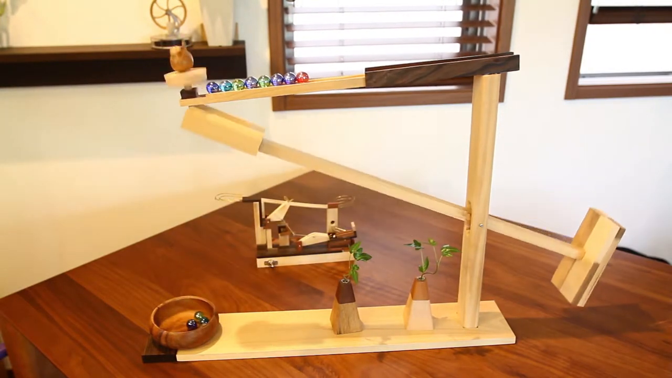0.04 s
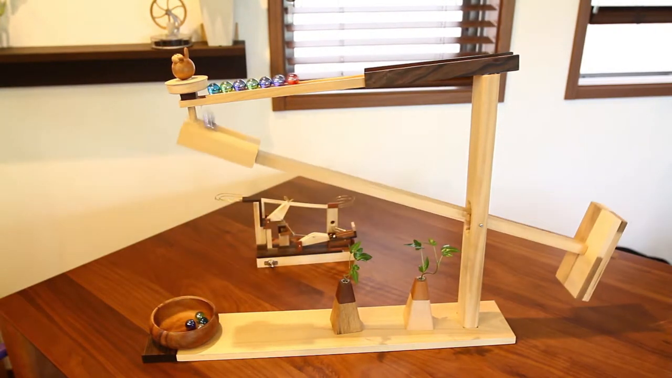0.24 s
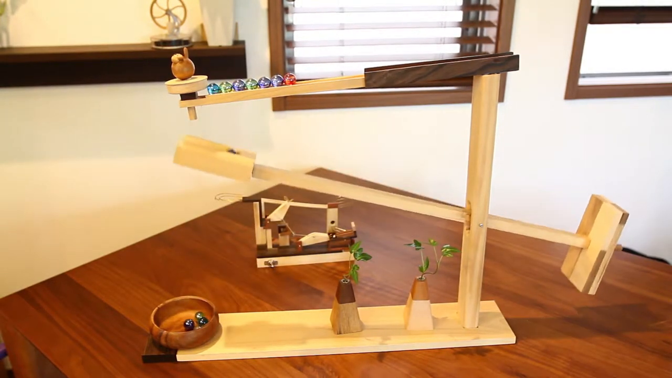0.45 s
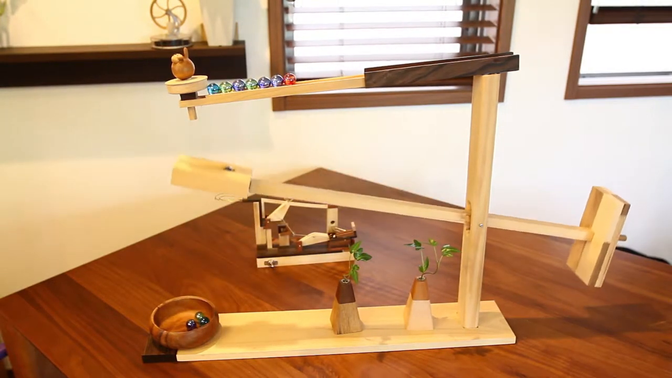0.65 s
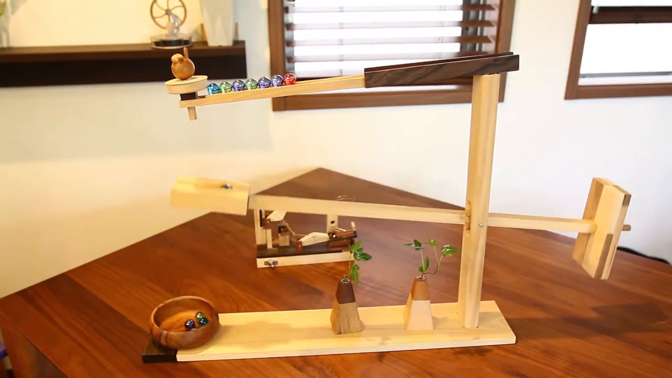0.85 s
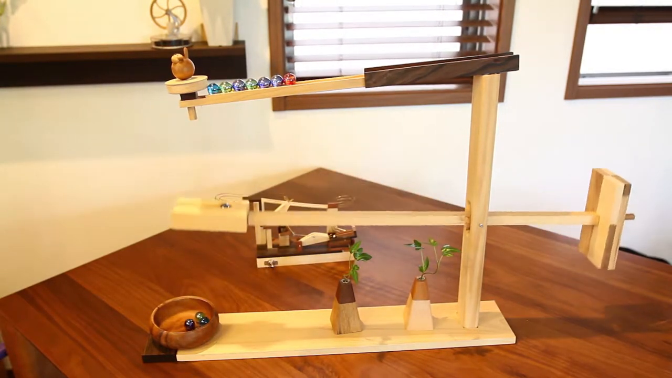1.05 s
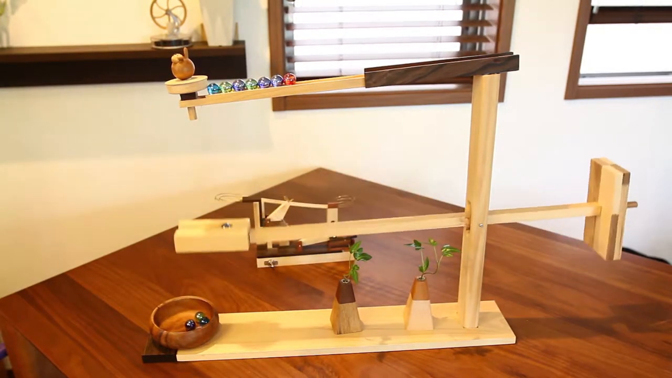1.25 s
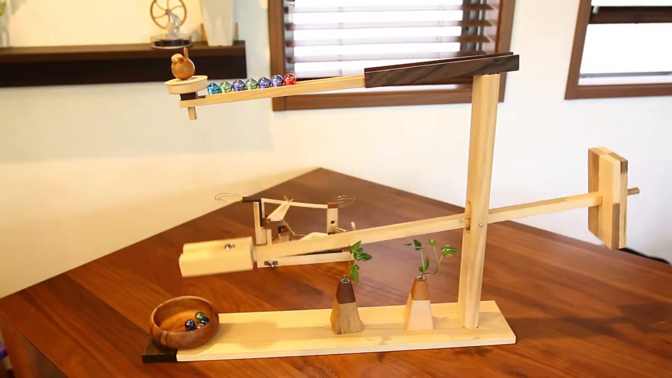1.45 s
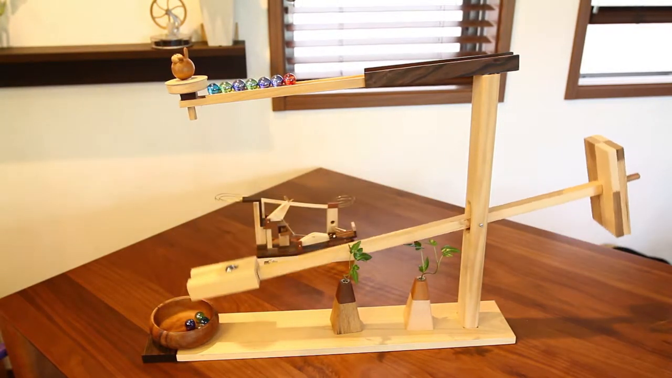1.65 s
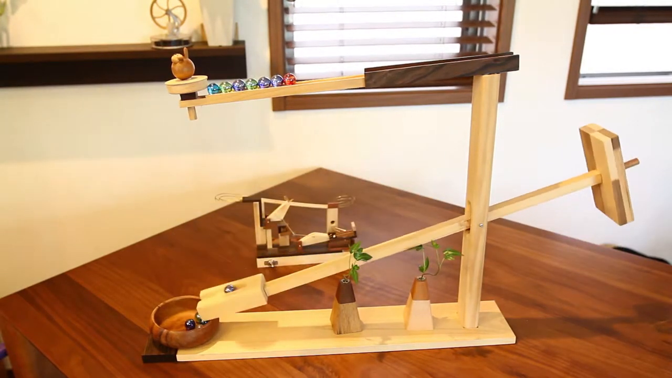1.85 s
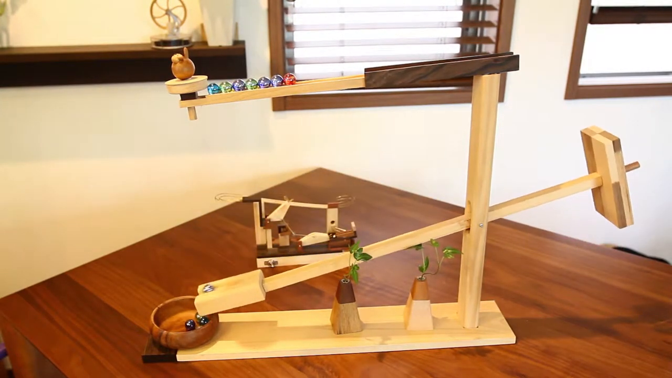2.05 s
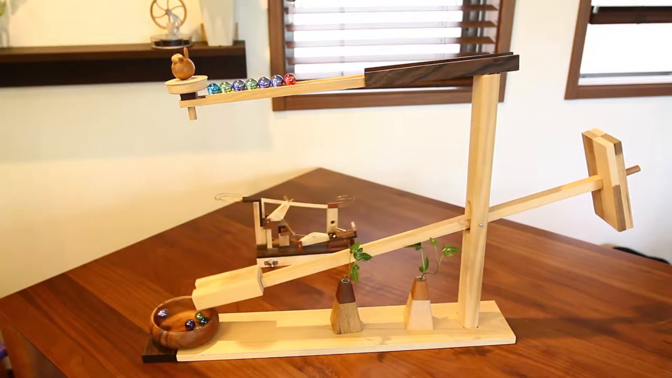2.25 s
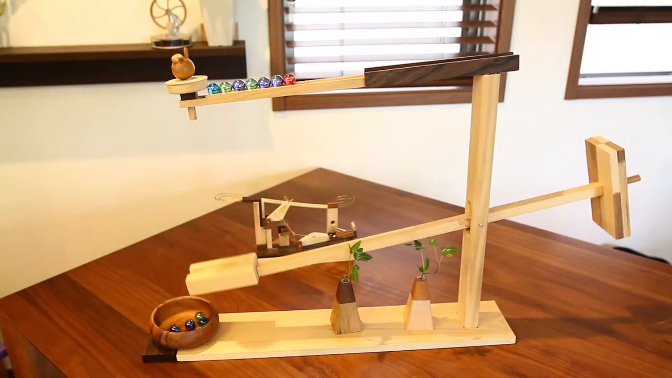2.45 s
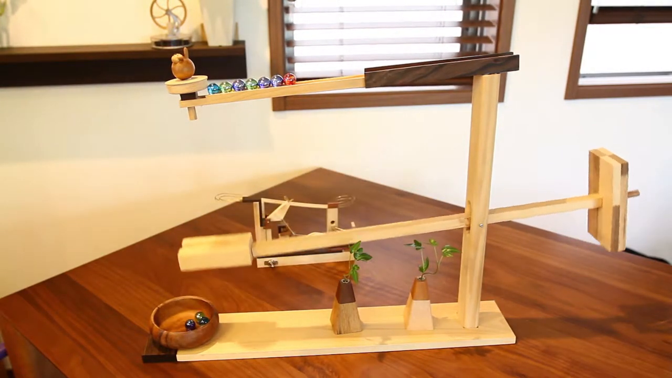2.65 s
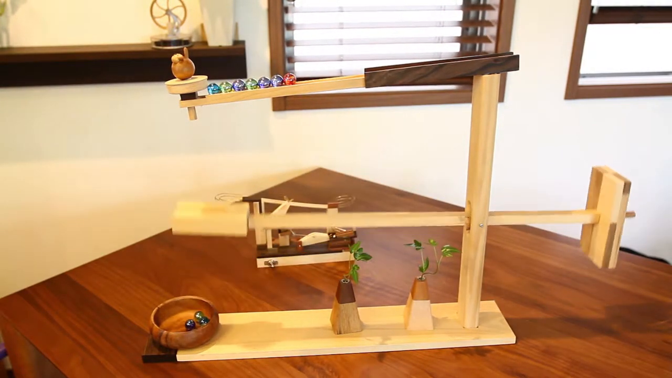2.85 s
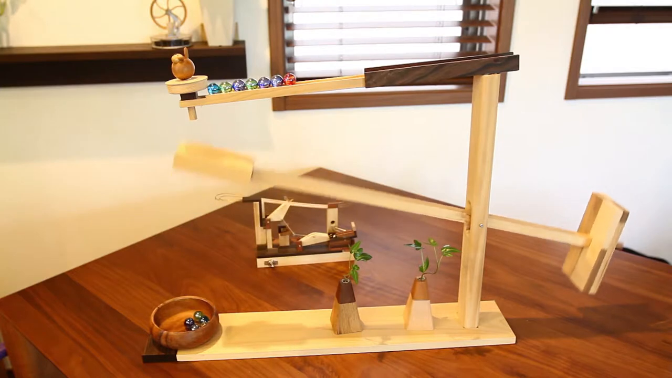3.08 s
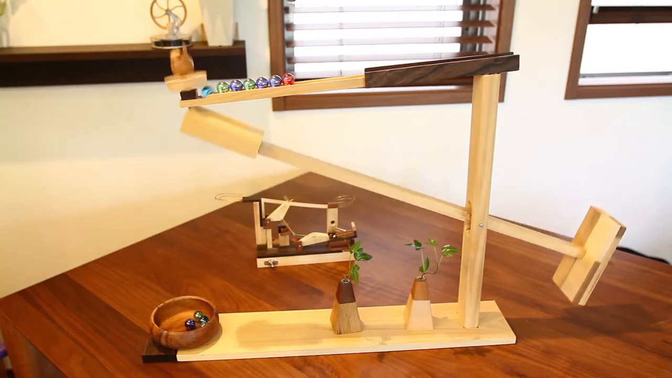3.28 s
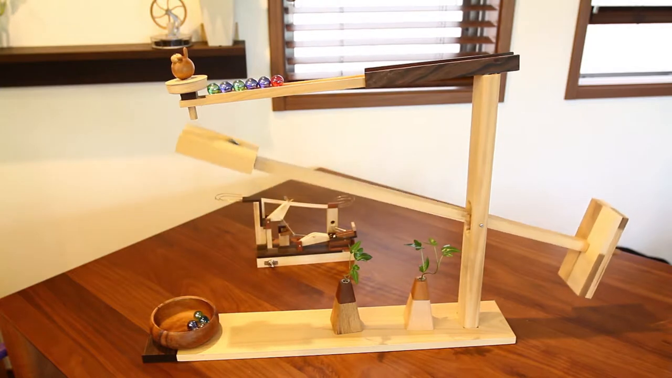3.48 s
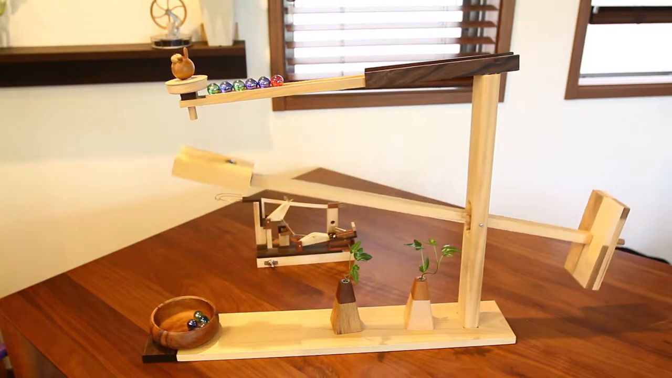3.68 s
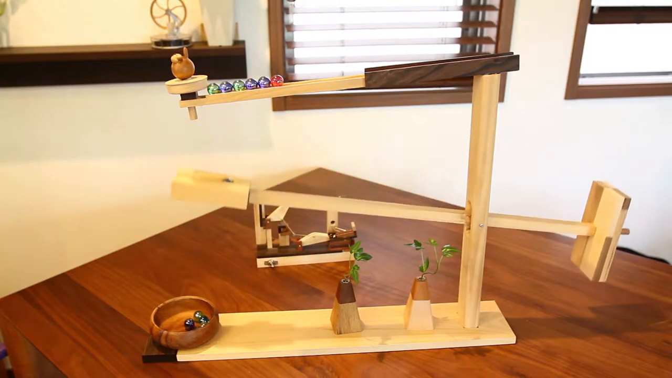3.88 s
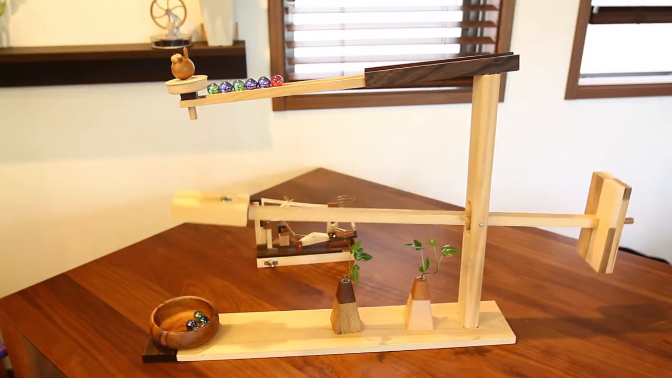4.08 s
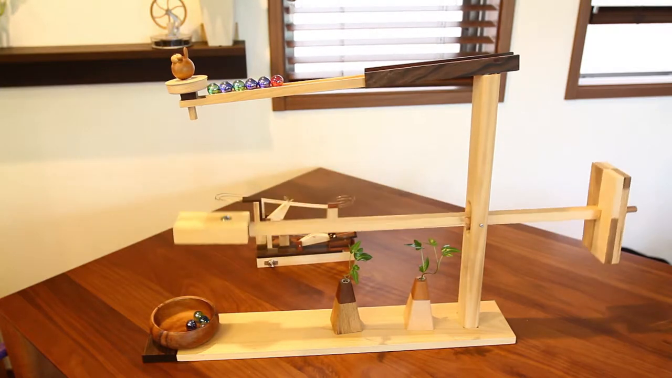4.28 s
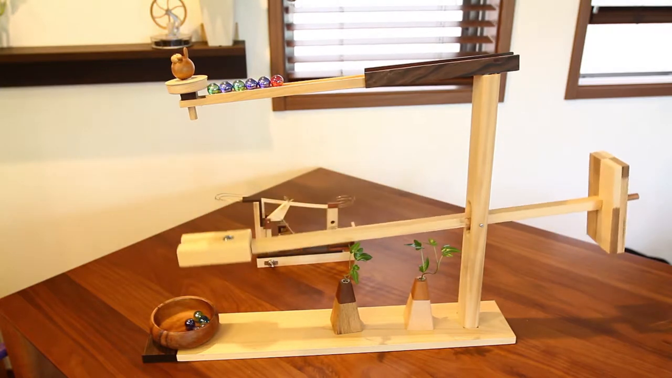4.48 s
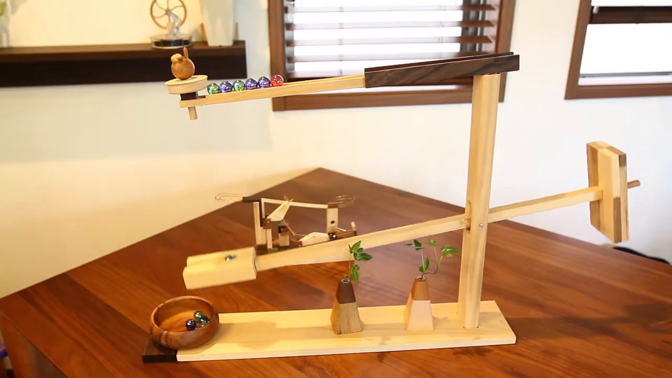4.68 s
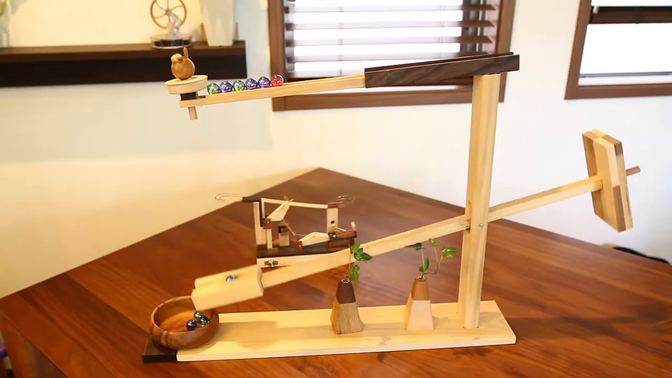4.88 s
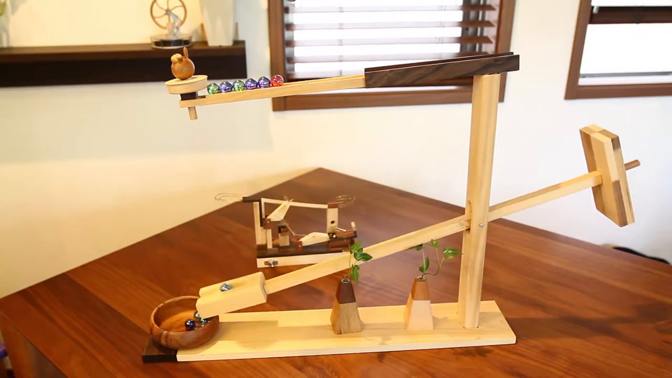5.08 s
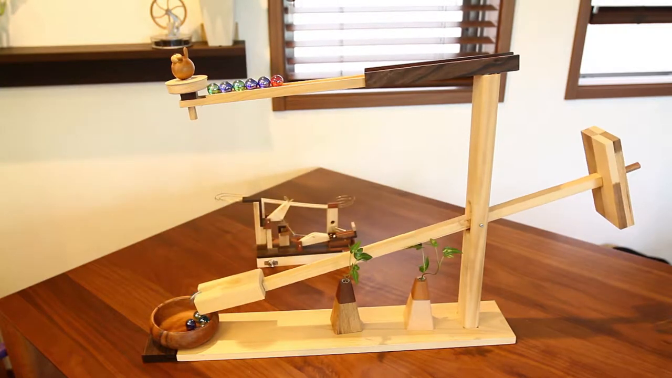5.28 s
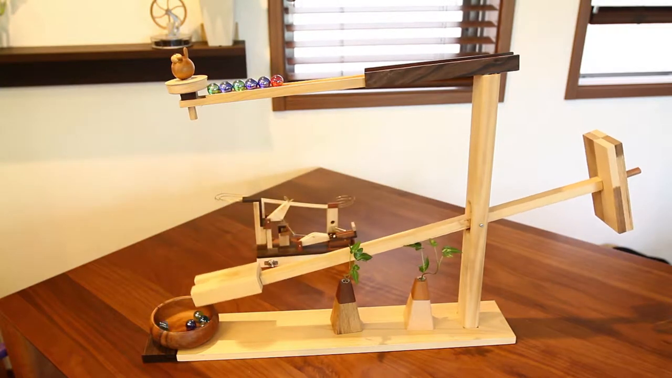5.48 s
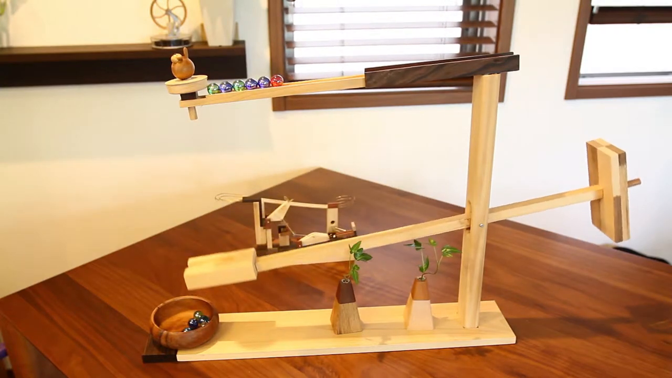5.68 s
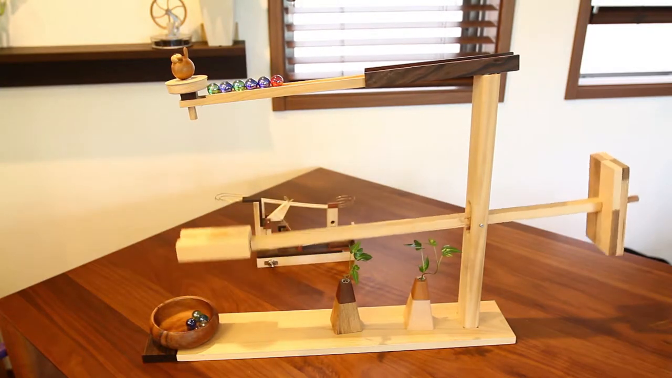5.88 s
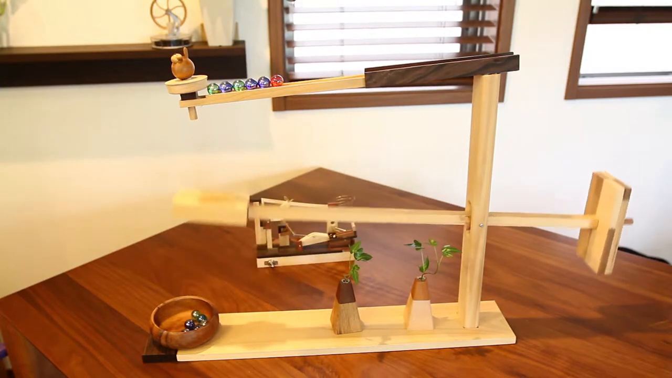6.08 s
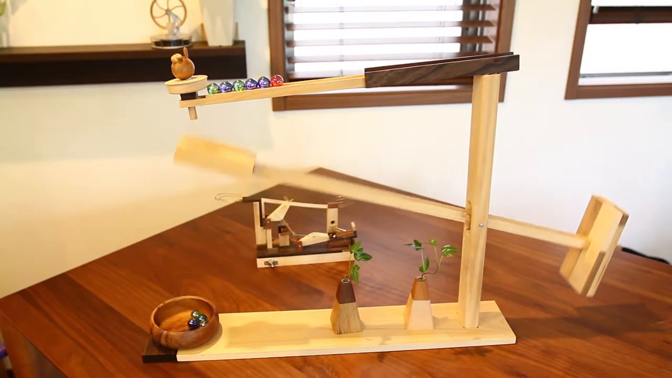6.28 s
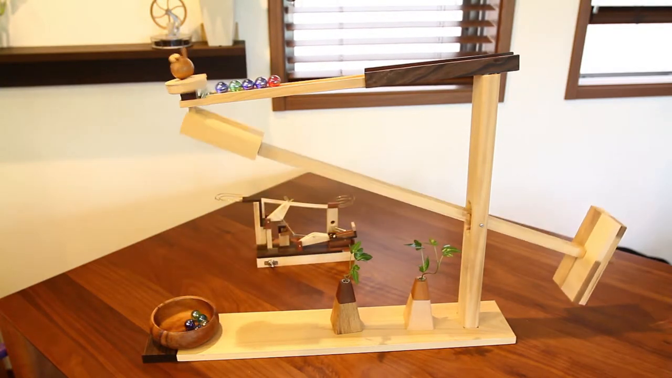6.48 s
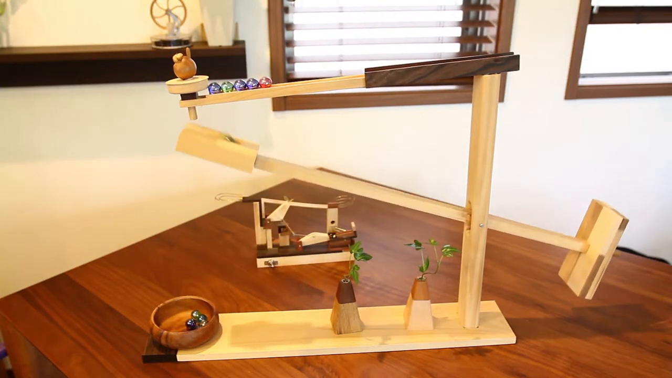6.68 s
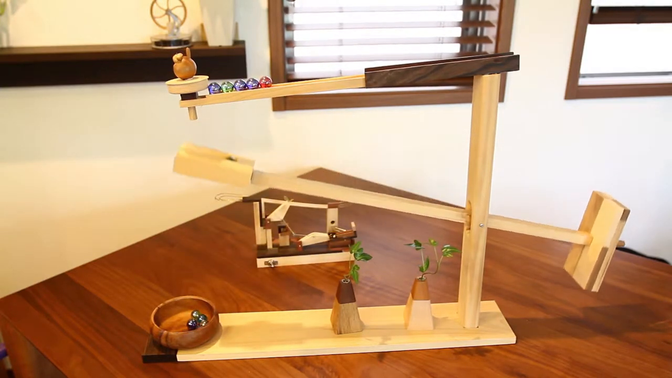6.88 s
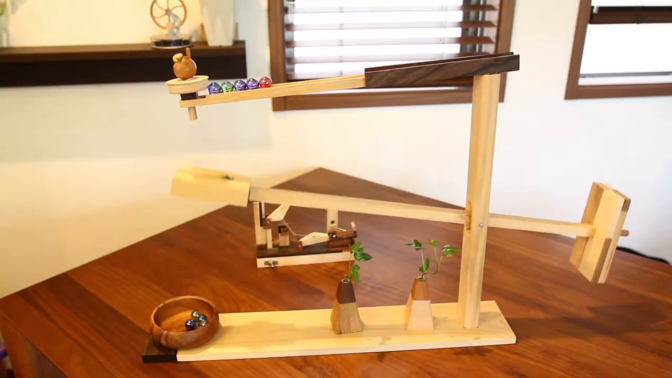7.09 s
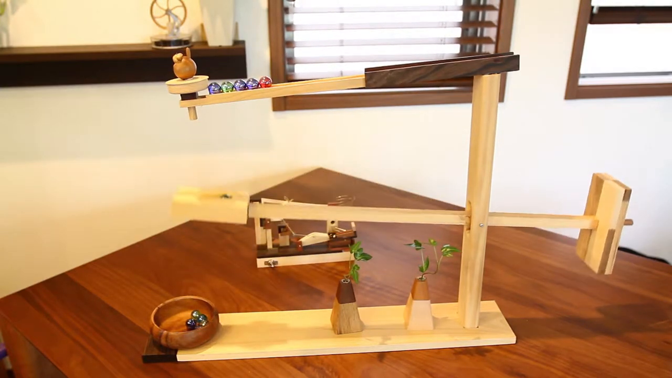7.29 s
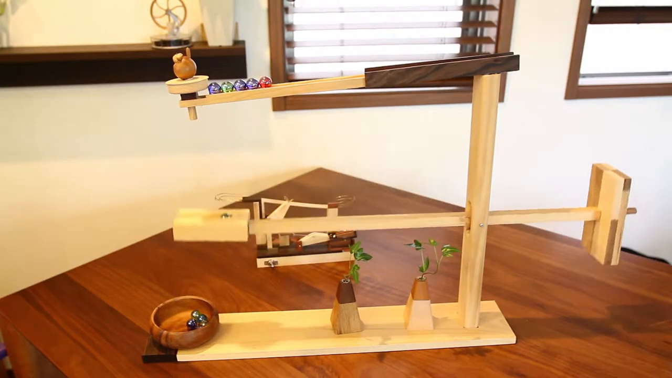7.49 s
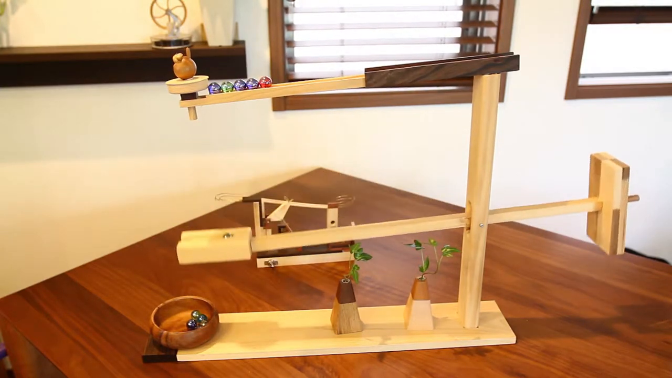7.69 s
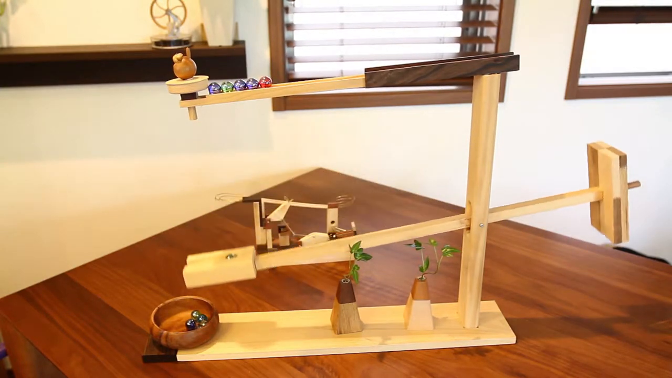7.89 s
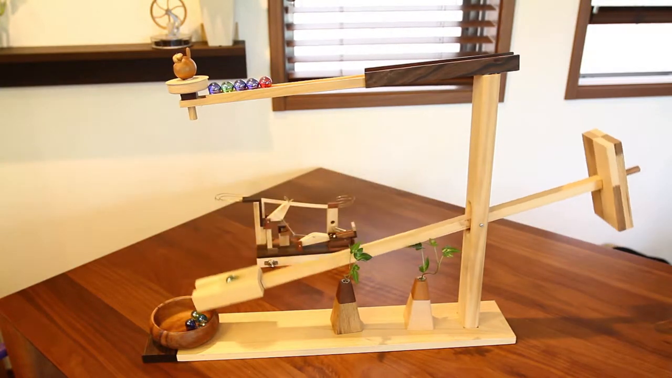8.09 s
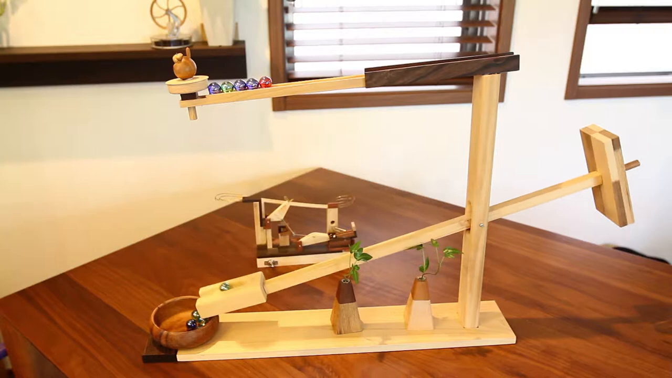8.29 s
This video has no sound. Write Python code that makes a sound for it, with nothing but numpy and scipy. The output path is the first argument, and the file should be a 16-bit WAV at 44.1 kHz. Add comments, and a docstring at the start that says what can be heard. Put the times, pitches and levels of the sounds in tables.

```python
"""A knock of wood on wood comes first, over faint room tone: a marble machine's arm opens a gate.
One glass marble rolls off the track and clacks into the arm's cup; the waiting marbles click together.
The arm sinks onto its stop, the marble cracks into a wooden bowl and clinks among the others, and the
emptied arm clacks as it lifts. Of three swings the last ends as the arm lands, after a few axle squeaks.
Knocks are short cracks and noisy rings, rolling is bumpy noise; both are shaped by each part's resonances."""
import sys
import numpy as np
from scipy import signal
from scipy.fft import rfft, irfft
from scipy.io import wavfile

SR = 44100
rng = np.random.default_rng(int(sys.argv[2]) if len(sys.argv) > 2 else 0)


def transcribe(signal):
    """Save signal, clipped to [-1, 1], as a 16-bit WAV file at the path in sys.argv[1]."""
    frames = np.atleast_2d(signal).T
    limited = np.clip(frames, -1, 1)
    pcm = np.round(limited * 32767).astype(np.int16)
    wavfile.write(sys.argv[1], SR, pcm)


N = 367794  # length in samples

# In the tables below, level_db comes before the gain_db of the function that plays it,
# and hardness_db_per_octave is a treble tilt above 500 Hz.
# A colour is a broad spectrum whose overall level is evened out; modes are resonances standing above it.


def amp(db):
    """Turns decibels into a gain."""
    return 10 ** (np.asarray(db) / 20)


def unit(x):
    """Scales a sound to an energy of one."""
    return x / np.sqrt(np.sum(x ** 2) + 1e-20)


def read(points, hz):
    """Joins (pitch_hz, value) points with straight lines on a log-frequency axis."""
    point_hz, value = np.transpose(points)
    return np.interp(np.log(hz + 1), np.log(point_hz + 1), value)


def add(mix, start_s, sound):
    """Mixes a sound in at its start time, cutting off what runs past the end."""
    part = mix[max(round(start_s * SR), 0):][:len(sound)]
    part += sound[:len(part)]


def body(colour, modes=(), tilt_db=0, size=8192):
    """A part's response to a tap: a broad colour with resonances standing out of it."""
    hz = np.fft.rfftfreq(size, 1 / SR)
    peaks = 1 + sum(amp(2 * db) / (1 + (2 * (hz - f) / width) ** 2) for f, width, db in modes)
    octaves = np.log2(np.maximum(hz, 500) / 500)
    spectrum = amp(read(colour, hz) + tilt_db * octaves) * np.sqrt(peaks)
    # folding the cepstrum gives minimum phase: the response starts at once
    cepstrum = irfft(np.log(spectrum))
    cepstrum[1:size // 2] *= 2
    return unit(irfft(np.exp(rfft(cepstrum[:size // 2], size))))


def noise(colour, modes=(), grain_db=0):
    """Coloured noise of rms one; grain_db, of either sign, makes its bumps uneven."""
    unevenness = np.clip(rng.standard_normal(N), -2, 2)
    bumps = rng.standard_normal(N) * amp(abs(grain_db) * unevenness)
    return unit(signal.oaconvolve(bumps, body(colour, modes))[:N]) * np.sqrt(N)


def crack_of(spread_s, size=4096, count=36):
    """A click smeared by the wood: each band arrives with its own small delay."""
    hz = np.fft.rfftfreq(size, 1 / SR)
    delay_s = np.interp(hz, np.linspace(0, SR / 2, count), spread_s * rng.exponential(1, count))
    phase = -2 * np.pi * np.cumsum(delay_s) * hz[1]
    return unit(irfft(np.exp(1j * phase))[:size // 2])


def strike(blows, colour, modes, gain_db, spread_s, ring_t60, ring_db):
    """Each blow is a short crack and a denser ring of the joined wood, heard through its resonances."""
    out, t = np.zeros(N), np.arange(SR // 3) / SR
    for start_s, level_db, tilt_db in blows:
        # the ring falls by 60 dB in ring_t60 seconds; ring_db is its energy against the crack
        ring = rng.standard_normal(len(t)) * np.exp(-np.log(1000) * t / ring_t60)
        force = amp(ring_db) * unit(ring)
        add(force, 0, crack_of(spread_s))
        # a harder contact is shorter and so reaches higher resonances
        blow = signal.fftconvolve(force, body(colour, modes, tilt_db, size=16384))
        add(out, start_s, amp(level_db + gain_db) * unit(blow))
    return out


def roll(runs, colour, modes, gain_db, grain_db, rise_s, release_s, fade_db_per_s):
    """Rolling or sliding contact bumps over the wood's grain: it sets in, grows quieter and stops."""
    level = np.zeros(N)
    for start_s, level_db, length_s in runs:
        t = np.arange(0, length_s, 1 / SR)
        contact = np.minimum(t / rise_s, 1) * np.minimum((length_s - t) / release_s, 1)
        add(level, start_s, contact * amp(level_db + gain_db - fade_db_per_s * t))
    return level * noise(colour, modes, grain_db)


def repeat(events, pattern):
    """Plays the same pattern of blows at every event."""
    return [(start_s + delay_s, level_db + step_db, tilt_db + harder_db)
            for start_s, level_db, tilt_db, *_ in events
            for delay_s, step_db, harder_db in pattern]


def bounces(events, count):
    """Each event is a run of evenly spaced blows whose level changes by equal steps."""
    return [(start_s + k * gap_s, level_db + k * step_db, tilt_db)
            for start_s, level_db, tilt_db, gap_s, step_db in events
            for k in range(count)]


# Colour of the steady room tone: pitch_hz, level_db
AIR_COLOUR = [(20, -39), (50, -15), (85, -10), (150, -8.5), (250, -4), (450, -8), (800, -8.5),
              (1300, -11.5), (2000, -18.5), (4000, -22), (8000, -27.5), (13000, -31), (16000, -39)]
AIR_DB = -50.5  # rms level against full scale


def room_tone():
    """The quiet room is steady coloured noise."""
    return amp(AIR_DB) * noise(AIR_COLOUR)


# The rising arm slides along the gate's peg and knocks it open:
# start_s, level_db, hardness_db_per_octave, slide_before_s, cup_lip_ping_db
KNOCKS = [(0.0287, -2, -0.5, 0.0013, -7.5), (3.2077, -1, -0.5, 0.02, -20), (6.3888, -3, 0, .029, -11)]
# Every knock throws the gate to and fro alike: delay_s, level_change_db, hardness_change_db_per_octave
GATE_SWING = [(0, 2, 0.4), (0.0163, 0.5, 3), (0.0236, -2.5, -3.5), (0.0599, -7, 1.5)]
# The freed marble jolts the gate on its way out: start_s, level_db, hardness_db_per_octave
GATE_JOLTS = [(0.1276, 2, 1), (3.3036, 0, -0.5), (3.331, 0.5, 6), (6.4511, -2.5, 3), (6.4608, -6, 4),
              (6.4948, -6, 2), (6.5227, -5.5, 3.5)]
# Broad colour of the gate: pitch_hz, level_db
GATE_COLOUR = [(40, -30), (110, 1), (190, 8.5), (420, -4.5), (1000, 1.5), (2600, 11.5), (4200, -4),
               (5200, -3.5), (9000, -10), (13500, -17.5), (16000, -35)]
# Resonances of the gate: pitch_hz, width_hz, level_db
GATE_MODES = [(132, 8.6, 6.5), (189, 16, 12), (263, 20, 0), (367, 19, 18), (560, 45, 16.5), (892, 49, 21),
              (1206, 28, 15.5), (1334, 39, 16), (1673, 120, 8.5), (2370, 60, 8), (4190, 95, 14.5)]
# Broad colour of the track: pitch_hz, level_db
TRACK_COLOUR = [(60, -16.5), (200, 2.5), (450, -4), (900, -4), (1600, 1), (2600, -2.5), (3800, -2),
                (5200, -17), (9000, -28.5), (16000, -40)]
# Resonances of the track: pitch_hz, width_hz, level_db
TRACK_MODES = [(924, 64, 8.7), (1686, 100, 8.3), (2350, 40, 12.4), (2660, 24, 4.3)]
PEG_DB, PEG_TILT_DB = -17.5, 5  # first touch on the peg: level against the knock, hardness per octave
TRACK_DELAY_S, TRACK_S = 0.043, 0.17  # the marble rolls this long after the knock, for this long


def gate():
    """The cup scrapes along the peg and knocks the gate open; one marble rolls down the track."""
    touches = [(s - slide_s, db + PEG_DB, PEG_TILT_DB) for s, db, _, slide_s, _ in KNOCKS]
    slides = [(s - slide_s, db, slide_s) for s, db, _, slide_s, _ in KNOCKS]
    runs = [(s + TRACK_DELAY_S, 0, TRACK_S) for s, *_ in KNOCKS]
    blows = repeat(KNOCKS, GATE_SWING) + GATE_JOLTS + touches
    knocks = strike(blows, GATE_COLOUR, GATE_MODES,
                    gain_db=10.5, spread_s=0.000993, ring_t60=0.036, ring_db=7)
    scrape = roll(slides, GATE_COLOUR, GATE_MODES,
                  gain_db=-32.5, grain_db=-6, rise_s=0.0033, release_s=0.0053, fade_db_per_s=2)
    track = roll(runs, TRACK_COLOUR, TRACK_MODES,
                 gain_db=-21.5, grain_db=0.5, rise_s=0.018, release_s=0.064, fade_db_per_s=27)
    return knocks + scrape + track


# The marble bounces in the hollow cup: start_s, level_db, hardness_db_per_octave, lip_ping_db
CUP_BLOWS = [(0.273, -7, -2, -11), (0.3538, -15.5, -10, -30), (0.3632, -6, -0.5, -20),
             (0.3782, -7.5, -0.7, -13.5), (0.4446, -12.5, -0.7, -16), (2.1195, -32, -5, -50),
             (3.4082, -9.5, -0.5, -24), (3.4185, -7, 4.5, -7), (3.4471, -14, 0.7, -2),
             (3.4837, -14, -5, -23), (3.5147, -8, -1, -26), (3.6096, -16.5, -4, -38),
             (5.2849, -27.5, -7, -44.5), (6.5647, -5.5, 1, -13), (6.6657, -15, -3, -36),
             (6.7266, 2, 6.5, -6)]
# It rolls about in the cup, coming to rest or tipping out: start_s, level_db, length_s
CUP_ROLLS = [(0.40, -32, 0.15), (2.09, -42, .08), (3.53, -34, 0.18), (5.28, -44, 0.087), (6.77, -35, 0.14)]
# Broad colour of a blow in the cup: pitch_hz, level_db
CUP_COLOUR = [(40, -15), (130, -5.5), (230, -3), (420, -13.5), (900, -1.5), (2400, 3), (4000, 4),
              (5200, -2), (9000, -5), (13000, -26.5), (16000, -31)]
# Resonances of the cup: pitch_hz, width_hz, level_db
CUP_MODES = [(533, 11, 19.5), (561.6, 13, 23), (1325, 84, 9), (1390, 44, 17), (3220, 60, -23.5),
             (4243, 190, 8.5)]
# Broad colour of the cup's thin lip: pitch_hz, level_db
LIP_COLOUR = [(200, -31), (2500, -16), (4250, 3), (5500, -26), (16000, -30)]
# Resonance of the lip: pitch_hz, width_hz, level_db
LIP_MODES = [(4257, 49, 17)]
# Broad colour of rolling in the cup: pitch_hz, level_db
CUP_HUM_COLOUR = [(80, -7.5), (230, 0), (560, -3.5), (900, -4.5), (1400, -5.5), (2400, -6.5), (4200, -21),
                  (9000, -31.5)]


def cup():
    """The marble bounces in the cup and rolls, making the hollow hum; its thin lip pings at knocks too."""
    blows = [(s, db, tilt_db) for s, db, tilt_db, _ in CUP_BLOWS]
    pings = [(s, lip_db, 0) for s, *_, lip_db in CUP_BLOWS + KNOCKS]
    hollow = strike(blows, CUP_COLOUR, CUP_MODES,
                    gain_db=14.0, spread_s=0.000428, ring_t60=0.06, ring_db=-3.0)
    lip = strike(pings, LIP_COLOUR, LIP_MODES,
                 gain_db=13, spread_s=0.000483, ring_t60=0.013, ring_db=-15)
    hum = roll(CUP_ROLLS, CUP_HUM_COLOUR, CUP_MODES,
               gain_db=4, grain_db=11.5, rise_s=0.029, release_s=0.053, fade_db_per_s=58.5)
    return hollow + lip + hum


# The waiting marbles close up: start_s, level_db, hardness_db_per_octave, gap_s, change_per_marble_db
QUEUE_SHIFTS = [(0.2378, -16, -10, 0.015, 1.1), (3.4288, -15.5, -7, 0.0057, -18),
                (6.6044, -13, -7, 0.0054, -17)]
# Broad colour of the waiting marbles: pitch_hz, level_db
QUEUE_COLOUR = [(300, -58), (4000, -19), (7000, -7.5), (9600, 3), (11500, -3.5), (16000, -12)]
# Their resonance: pitch_hz, width_hz, level_db
QUEUE_MODES = [(9300, 500, 4)]


def queue():
    """The marbles left on the track click together one after another."""
    return strike(bounces(QUEUE_SHIFTS, count=4), QUEUE_COLOUR, QUEUE_MODES,
                  gain_db=15.0, spread_s=0.000618, ring_t60=0.068, ring_db=-1.0)


# Colour of the marble trembling in the cup: pitch_hz, level_db
CUP_RUMBLE_COLOUR = [(80, -6), (250, -5.5), (520, 7), (750, -7.5), (1250, -2.5), (2200, -11), (8000, -25)]
# The marble circles the bowl: start_s, level_db, length_s
BOWL_ROLLS = [(2.56, -49.5, 0.64), (5.72, -56, 0.63)]
# Colour of the marble rolling in the bowl: pitch_hz, level_db
BOWL_RUMBLE_COLOUR = [(100, -21), (330, 8), (700, -1.5), (1100, 3), (1650, 0), (2300, -31), (8000, -43)]
RIDE_DELAY_S, RIDE_DB = 0.54, -47.5  # the ride starts this long after the knock; level before gain


def rumble():
    """The marble rumbles faintly as it rides in the cup until the arm lands, and as it circles the bowl."""
    rides = []
    for knock, landing in zip(KNOCKS, LANDINGS):
        start_s = knock[0] + RIDE_DELAY_S
        rides.append((start_s, RIDE_DB, landing[0] - start_s))
    riding = roll(rides, CUP_RUMBLE_COLOUR, (),
                  gain_db=-8.0, grain_db=1.5, rise_s=0.13, release_s=0.043, fade_db_per_s=5)
    circling = roll(BOWL_ROLLS, BOWL_RUMBLE_COLOUR, (),
                    gain_db=1.5, grain_db=1.5, rise_s=0.054, release_s=0.066, fade_db_per_s=16)
    return riding + circling


# The sinking arm touches its stop, then lands with its full weight:
# start_s, level_db, hardness_db_per_octave, full_weight_after_s
LANDINGS = [(1.8502, 3, 0, 0.042), (5.0096, 1, -1.4, 0.042), (8.1994, 3, -0.5, .0381)]
# Every touch flexes the arm alike: delay_s, level_change_db, hardness_change_db_per_octave
ARM_FLEX = [(0, -3.5, -3), (.006, -6, 2.5), (.02, -4.5, -3.5)]
# The landed arm chatters: start_s, level_db, hardness_db_per_octave, gap_s, change_per_bounce_db
STOP_CHATTERS = [(1.9137, 10, 2.5, 0.0052, -12.5), (5.0651, 4.5, -0.5, 0.015, -11),
                 (8.2528, 4.5, 1.5, .014, -1)]
# Broad colour of the stop: pitch_hz, level_db
STOP_COLOUR = [(25, -41), (100, -10.5), (220, -3.5), (600, -1), (1100, 1.5), (1700, 0.5), (2200, -5),
               (3200, -7.5), (5000, -13.5), (8000, -21), (12000, -28.5), (16000, -46)]
# Resonances of the stop: pitch_hz, width_hz, level_db
STOP_MODES = [(142.8, 8, 13), (244, 42, 6.8), (340.7, 17, 9.3), (556, 37, 6.3), (923, 80, 2.7),
              (1183, 60, 3.9), (3020, 310, 8), (4510, 130, 8.7)]
WEIGHT_DB, WEIGHT_TILT_DB = 2, -1  # full weight against first touch: level, hardness per octave


def stop():
    """The arm touches its stop, lands with its full weight and chatters, shaking the base."""
    weight = [(s + after_s, db + WEIGHT_DB, tilt_db + WEIGHT_TILT_DB)
              for s, db, tilt_db, after_s in LANDINGS]
    blows = repeat(LANDINGS, ARM_FLEX) + weight + bounces(STOP_CHATTERS, count=3)
    return strike(blows, STOP_COLOUR, STOP_MODES,
                  gain_db=3.0, spread_s=0.000489, ring_t60=0.097, ring_db=1.5)


# The marble falls on hard wood, the bowl or the cup's floor: start_s, level_db, hardness_db_per_octave
DROP_BLOWS = [(2.2091, 2, -0.3), (5.3843, 2.5, -0.3), (6.7269, -29, 9)]
# Broad colour of the fall: pitch_hz, level_db
DROP_COLOUR = [(25, -20), (90, -46.5), (300, -14), (1000, -10), (2000, -7.5), (2800, -1), (5000, -0.5),
               (7000, -6.5), (9500, -1), (12000, -10), (16000, -15.5)]
# Resonances of the struck wood: pitch_hz, width_hz, level_db
DROP_MODES = [(556, 60, 2), (1490, 130, 4.5), (3230, 140, 10.5), (6500, 450, 10)]
# The marble bounces on the bowl's wall: start_s, level_db, hardness_db_per_octave
BOWL_BLOWS = [(2.2823, -11, 1.7), (5.4690, -9, 1.5)]
# Broad colour of the bowl's wall: pitch_hz, level_db
BOWL_COLOUR = [(100, -18), (600, -16.5), (2500, -8), (5000, -4), (9000, -16), (16000, -26)]
# Resonances of the bowl: pitch_hz, width_hz, level_db
BOWL_MODES = [(1114, 26, 27), (2560, 88, 16), (6300, 150, 8.9), (11000, 530, 14.4)]


def drop():
    """The falling marble cracks onto the wood and rebounds against the bowl's wall."""
    crack = strike(DROP_BLOWS, DROP_COLOUR, DROP_MODES,
                   gain_db=16.0, spread_s=0.000786, ring_t60=0.019, ring_db=-20.0)
    wall = strike(BOWL_BLOWS, BOWL_COLOUR, BOWL_MODES,
                  gain_db=17, spread_s=0.000565, ring_t60=0.043, ring_db=8)
    return crack + wall


# Quick flams of the lifting arm: start_s, level_db, hardness_db_per_octave, gap_s, change_per_bounce_db
LIFTS = [(2.3308, -7, 1, 0.0037, 0.5), (2.3741, -10.5, -0.5, 0.011, -4), (5.5028, -5, 2.5, .004, -1.5),
         (5.5278, -9.5, 0.1, 0.0084, -6)]
# Broad colour of the emptied arm: pitch_hz, level_db
LIFT_COLOUR = [(40, -24), (100, -10.5), (220, 1), (1000, 5), (1700, 3.5), (3600, -1.5), (4800, 6),
               (6500, -6.5), (10000, -12.5), (16000, -31)]
# Resonances of the emptied arm: pitch_hz, width_hz, level_db
LIFT_MODES = [(1124, 19, 13.3), (1590, 210, 1.2), (3070, 160, 8.7), (4570, 210, 8.1), (4900, 130, 2.9),
              (5280, 110, 4.8)]


def lift():
    """The emptied arm clacks and buzzes as it leaves the stop."""
    return strike(bounces(LIFTS, count=3), LIFT_COLOUR, LIFT_MODES,
                  gain_db=13.5, spread_s=0.000783, ring_t60=0.37, ring_db=0.5)


# Glass meets glass in the bowl: start_s, level_db, hardness_db_per_octave
CLINK_BLOWS = [(2.6157, -8.5, -0.5), (2.7765, -14.5, 1), (2.9171, -11, 1.5), (2.9661, -9, 1.5),
               (3.0122, -18, 2), (4.0791, -30, -5), (5.6487, -7, 6), (5.762, -16.5, 2), (5.8021, -11, 1.5),
               (5.9077, -19, -0.5)]
# Broad colour of the clinks: pitch_hz, level_db
CLINK_COLOUR = [(100, -43), (1100, -4), (2600, -19), (4300, -4), (7000, -4.5), (10000, -1.5), (13000, -7.5),
                (16000, -27)]
# Resonances of the clinks: pitch_hz, width_hz, level_db
CLINK_MODES = [(6800, 140, 7.8), (7850, 92, 11)]


def clinks():
    """The new marble runs into the others in the bowl."""
    return strike(CLINK_BLOWS, CLINK_COLOUR, CLINK_MODES,
                  gain_db=6, spread_s=0.000622, ring_t60=0.021, ring_db=-3.5)


# The axle squeaks: start_s, level_db, pitch_hz, length_s
SQUEAKS = [(7.17, -51.5, 495, 0.1), (8.09, -57, 2700, 0.046), (8.13, -38, 3160, .014),
           (8.142, -53, 3250, 0.053)]


def pivot(overtone_db=-20):
    """The axle sticks and slips in brief, nearly pure squeaks with two weak overtones."""
    out = np.zeros(N)
    for start_s, level_db, pitch_hz, length_s in SQUEAKS:
        t = np.arange(0, length_s, 1 / SR)
        tone = sum(amp(overtone_db * k) * np.sin(2 * np.pi * (k + 1) * pitch_hz * t) for k in range(3))
        add(out, start_s, amp(level_db) * tone * np.hanning(len(t)))
    return out


# Reflections from the table top and nearby wood: delay_s, level_db
ECHOES = [(.0040, -13.5), (.0056, -14.5), (.0086, -30)]


def echoes(x):
    """The direct sound plus first reflections from the table and the machine itself."""
    out = x.copy()
    for delay_s, level_db in ECHOES:
        add(out, delay_s, amp(level_db) * x)
    return out


# Time the room's echo takes to fall by 60 dB: pitch_hz, decay_s
ROOM_T60 = [(140, 0.47), (400, 0.55), (1000, 0.43), (3000, 0.43), (7500, 0.38), (15000, 0.2)]


def room(x, build_s=0.0011):
    """Diffuse tail that builds up quickly, each band dying at its own speed."""
    hz, t, bands = signal.stft(rng.choice([-1., 1.], SR), SR, nperseg=256)
    decay = np.exp(-np.log(1000) * t / read(ROOM_T60, hz)[:, None])
    tail = signal.istft(bands * decay, SR, nperseg=256)[1]
    tail *= 1 - np.exp(-(np.arange(len(tail)) / SR / build_s) ** 2)
    return signal.fftconvolve(x, unit(tail))[:N]


def scene():
    """All parts of the machine, each with its own path through the room, over the room tone."""
    # sound, room_level_db
    parts = [(gate(), -2), (cup(), -5), (queue(), 1), (rumble() + pivot(), -1),
             (stop(), -2), (drop(), -5), (lift(), 1), (clinks(), -3)]
    direct = echoes(sum(sound for sound, _ in parts))
    wet = sum(amp(room_db) * room(sound) for sound, room_db in parts)
    return (direct + wet + room_tone())[None]


EDGE_HZ = 16000  # upper limit of the treble


def record(dry):
    """Peaks beyond full scale overload the input and are cut flat; then a low-pass limits the treble."""
    clipped = np.clip(dry, -1, 1)
    low_pass = signal.firwin(255, EDGE_HZ, window=("kaiser", 8), fs=SR)
    return signal.oaconvolve(clipped, low_pass[None], "same")


dry = scene()
out = record(dry)
transcribe(out)
```